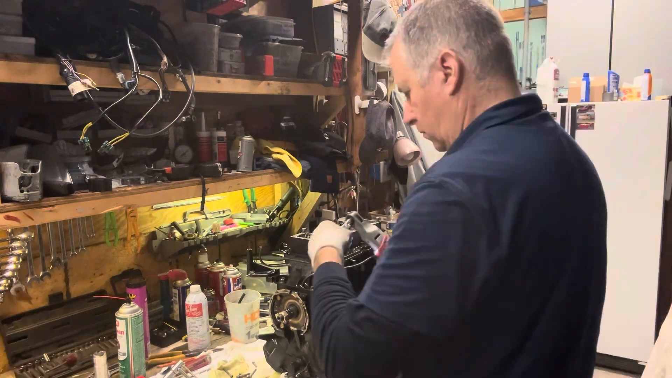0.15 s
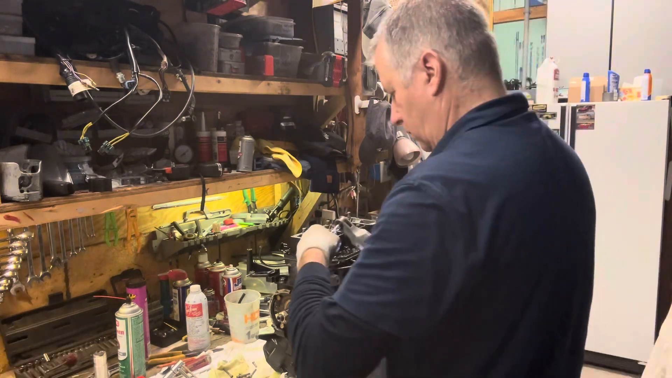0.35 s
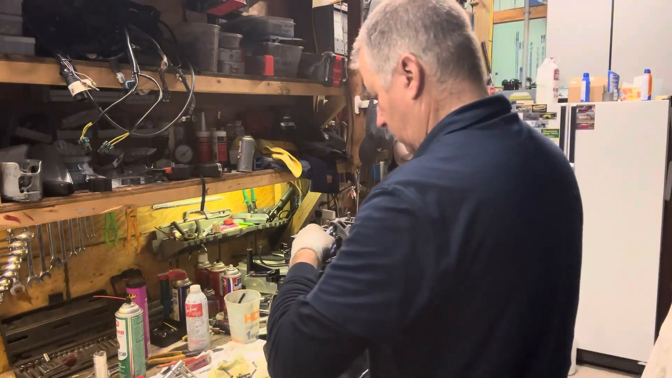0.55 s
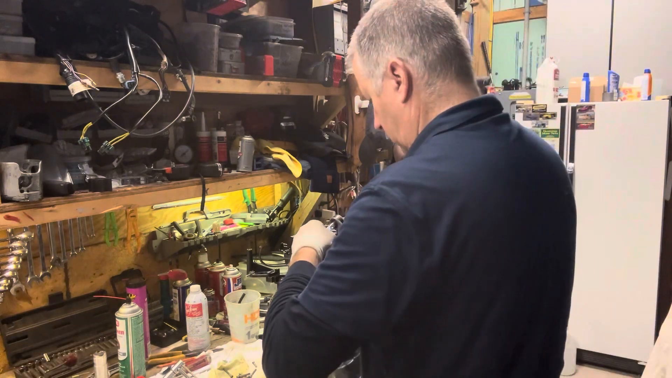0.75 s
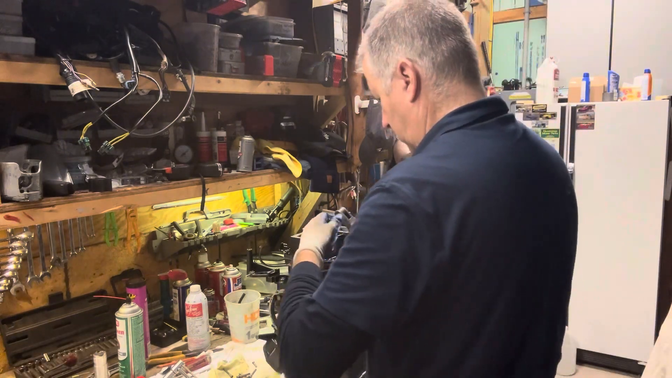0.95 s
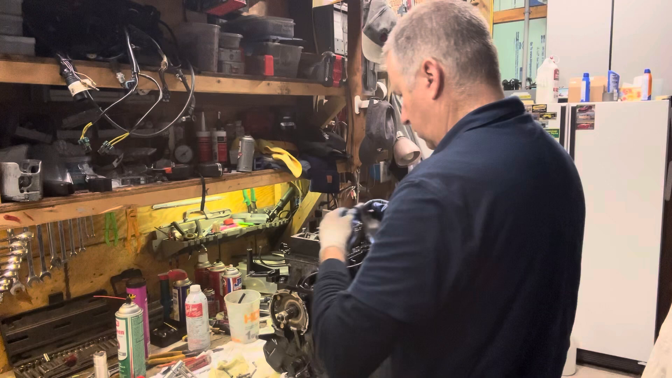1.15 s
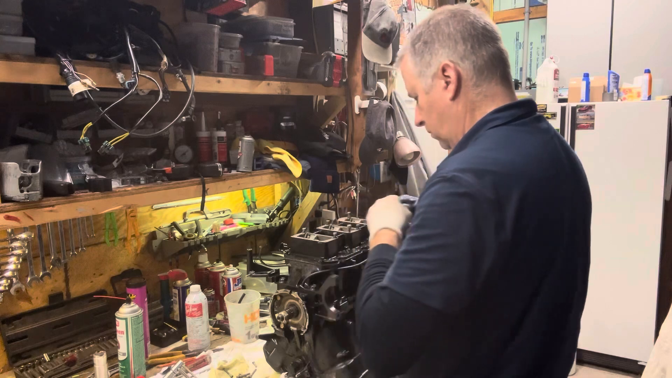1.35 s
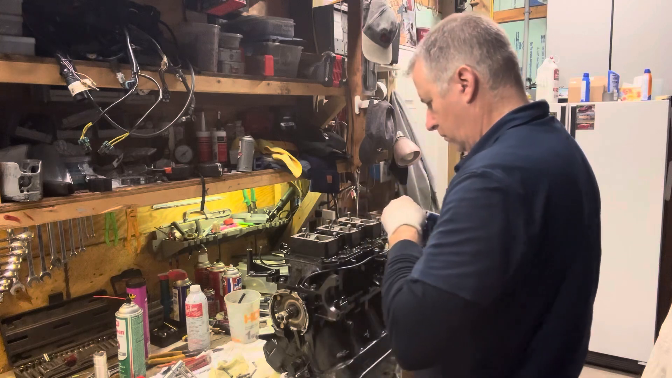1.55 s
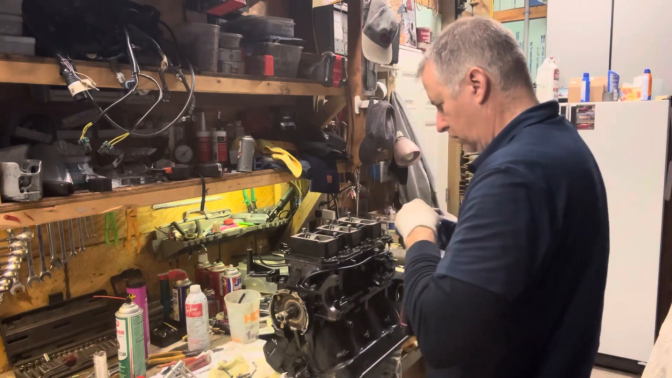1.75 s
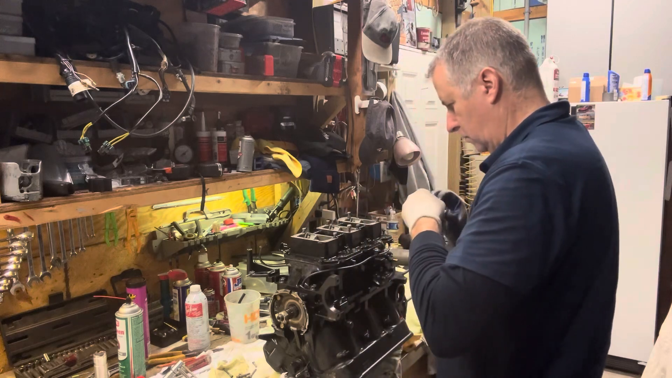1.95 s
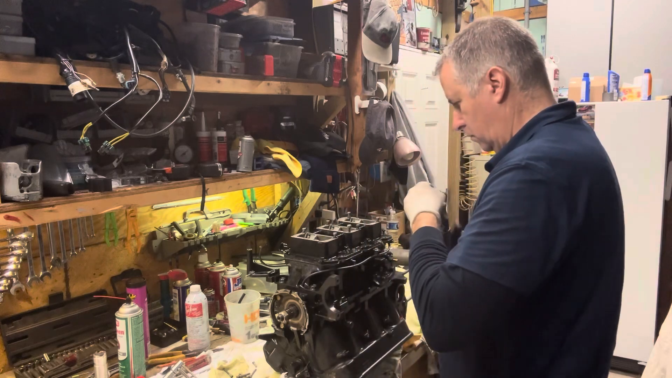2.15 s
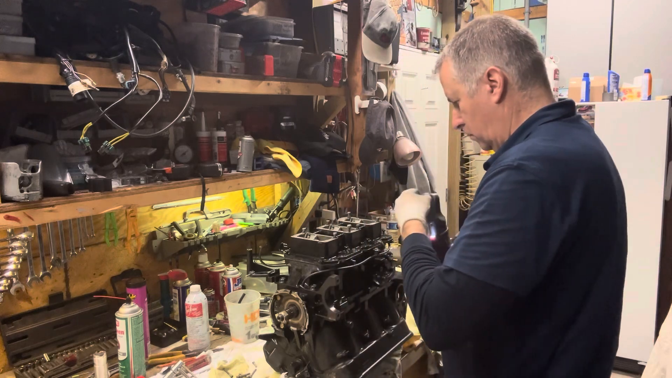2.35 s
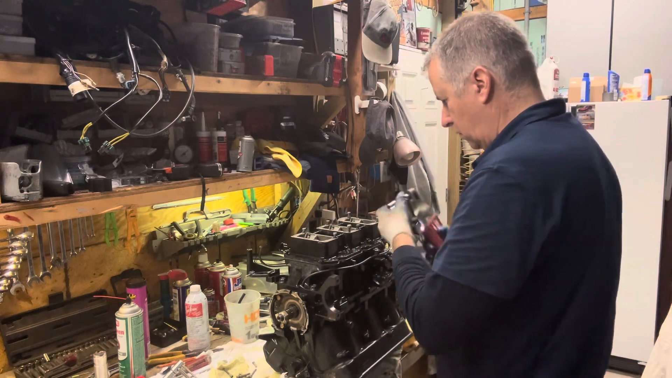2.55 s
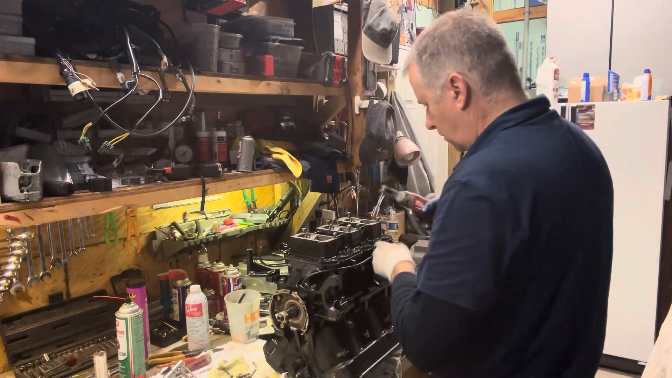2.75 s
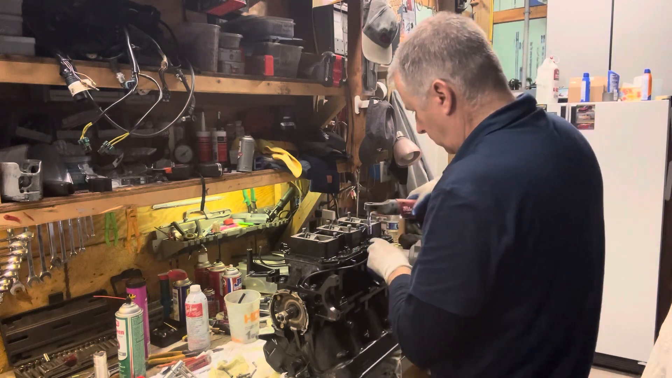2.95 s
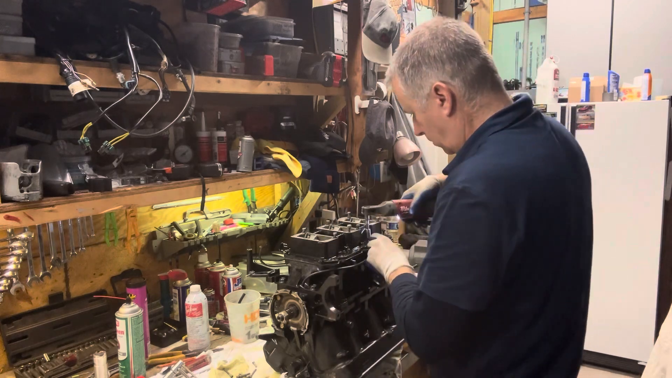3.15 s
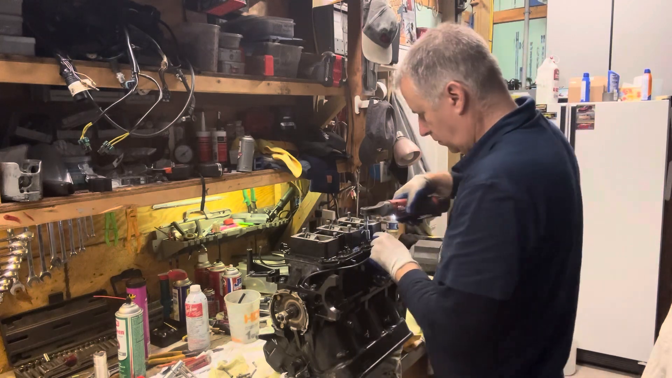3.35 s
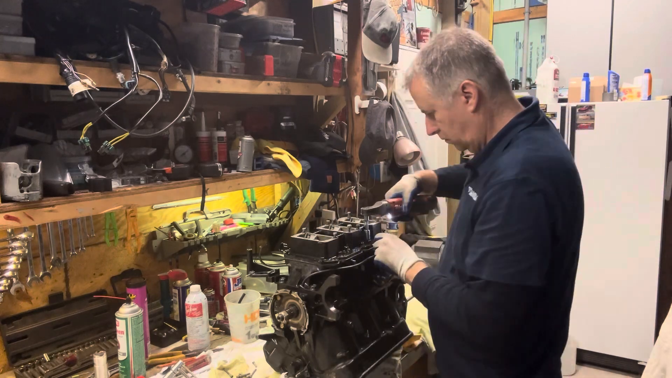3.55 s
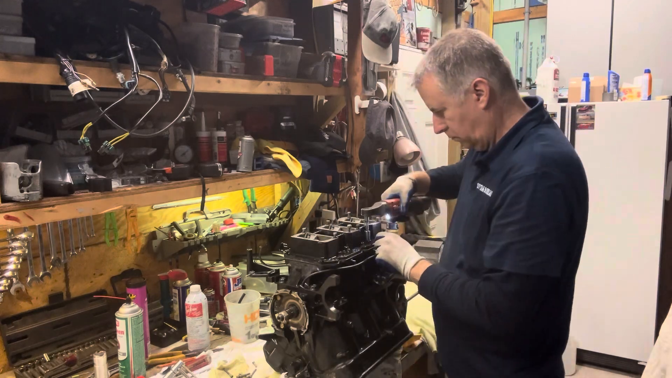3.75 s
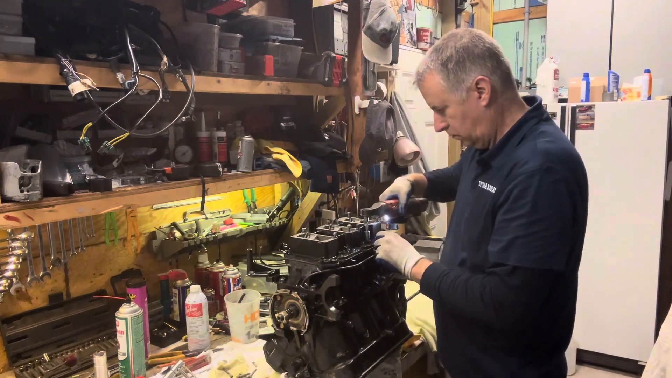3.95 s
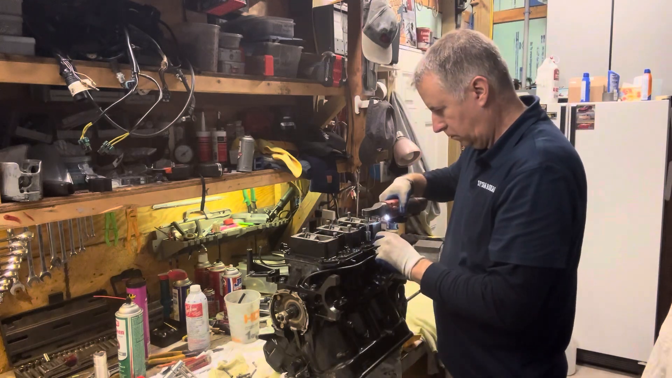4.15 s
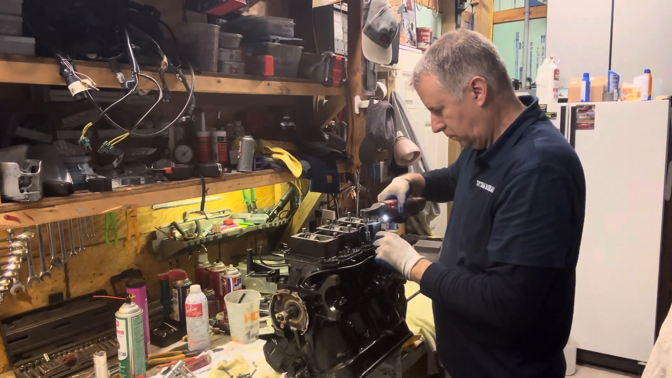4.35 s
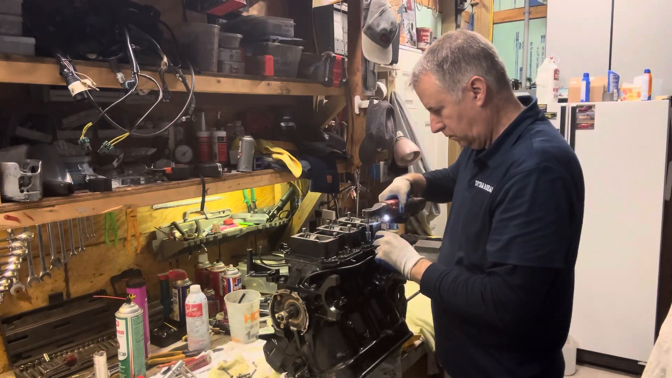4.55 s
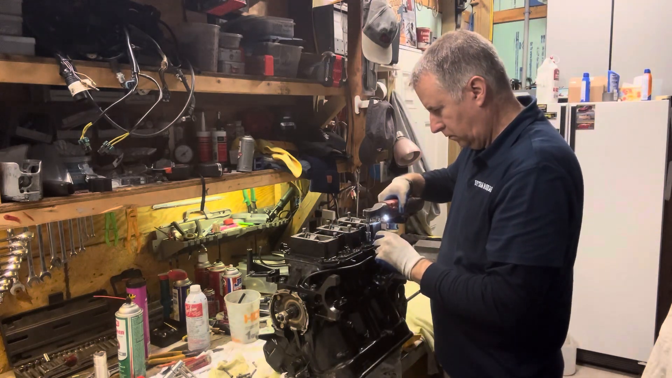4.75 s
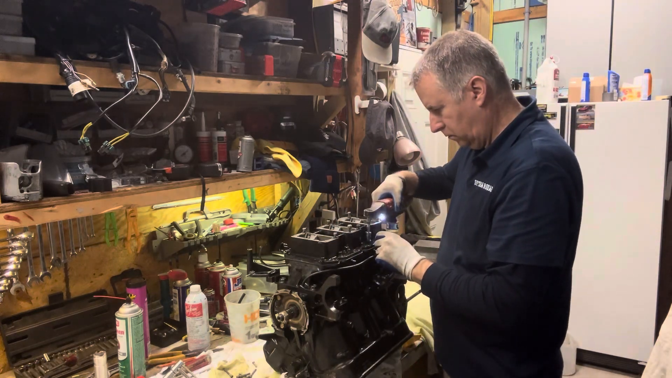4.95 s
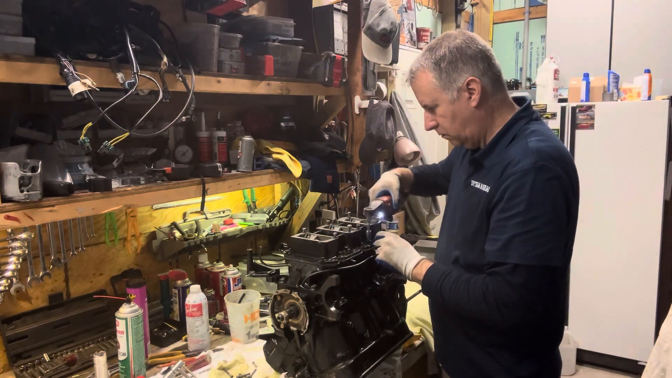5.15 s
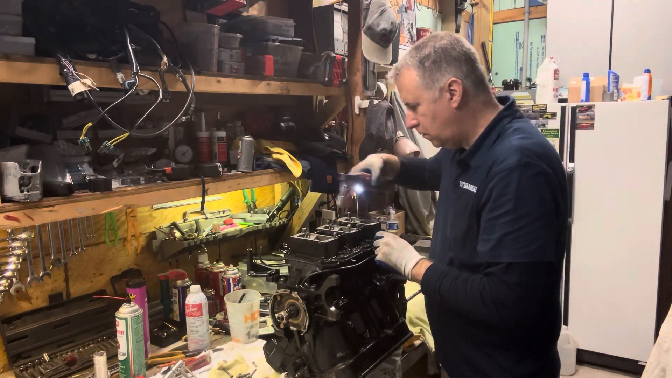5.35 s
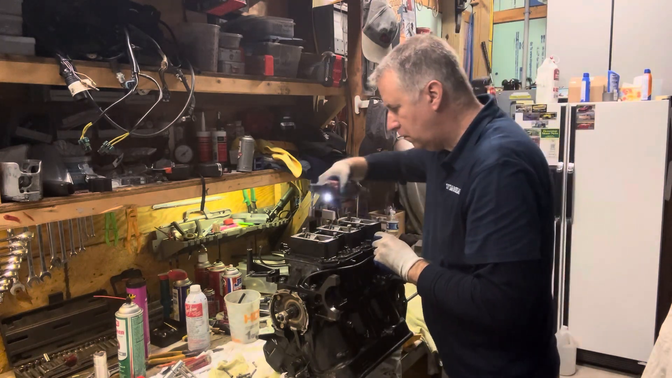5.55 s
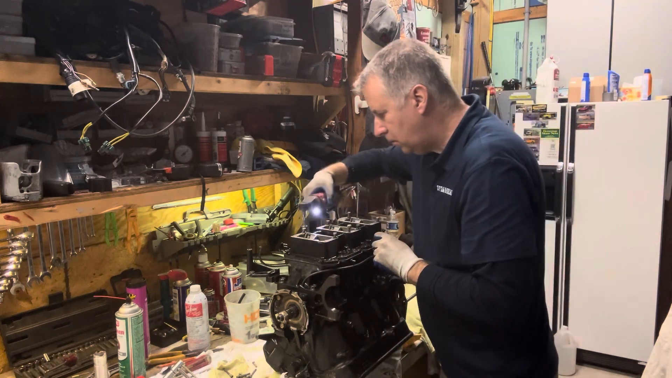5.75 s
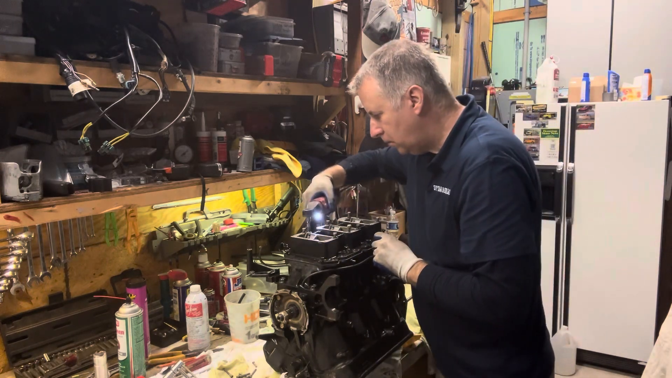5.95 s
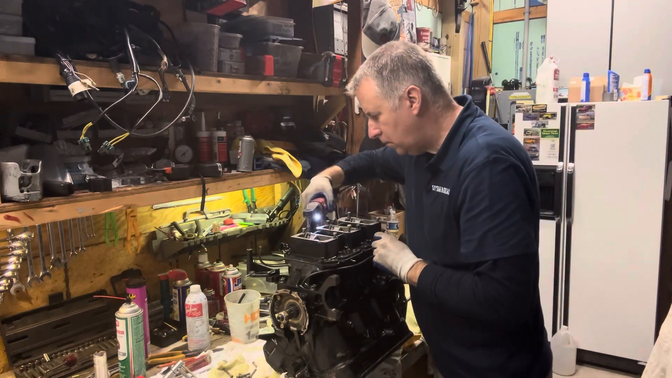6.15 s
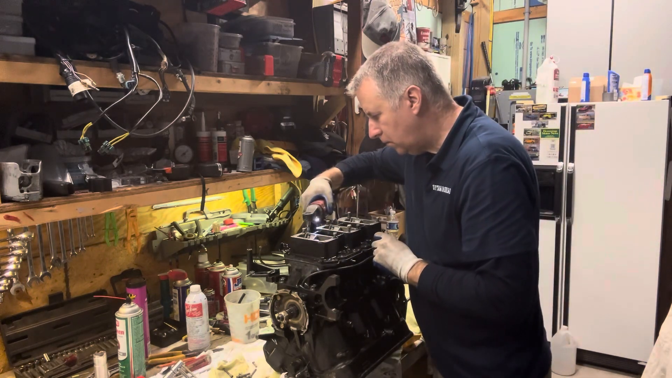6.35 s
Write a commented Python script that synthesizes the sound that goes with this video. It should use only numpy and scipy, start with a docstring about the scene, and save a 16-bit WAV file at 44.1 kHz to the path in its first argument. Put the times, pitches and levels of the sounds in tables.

```python
"""Over the low rumble of a small garage, a cordless ratchet runs a bolt into an engine block: the
motor sings as it starts, gear impacts excite the metal's modes and the pawl snaps once a stroke.
For three seconds the socket clinks on the bolts, and sleeves and shoes scuff by stick-slip friction.
A long burst follows, rising and then sagging in speed, and just after it a short, slow one.
More clinks and scuffs lead to a fourth brief burst at the end."""
import sys
import numpy as np
from scipy import signal
from scipy.fft import rfft, irfft, next_fast_len
from scipy.io import wavfile
from scipy.ndimage import map_coordinates

SR = 44100
rng = np.random.default_rng(int(sys.argv[2]) if len(sys.argv) > 2 else 0)


def master(y):
    """Save y as 16-bit WAV."""
    cut = np.clip(np.atleast_2d(y).T, -1, 1)
    pcm = np.round(cut * 32767)  # scale
    wavfile.write(sys.argv[1], SR, pcm.astype(np.int16))


N = 281799

# Levels in the tables are relative; each source adds its own gain.
# trigger pulls: press_s, release_s, rattle_db, treble_db, ring_db, pawl_db, tones_db
TRIGGER_PULLS = [(0.146, 0.408, -32, -34.5, -36.5, -18.5, -9), (3.482, 4.603, -33, -29, -38, -13.5, -0.5),
                 (4.764, 4.92, -31, -36, -39.5, -10.5, -4), (6.111, 6.401, -29.5, -43, -38, -8.5, -1)]
# speed that trigger and bolt allow, one curve per pull: time_s, stroke_rate_hz
SPEED_LIMITS = [
    [(.18, 55), (.3, 63), (.42, 43)],
    [(3.52, 56), (3.65, 68), (3.82, 74), (3.9, 71), (3.97, 58), (4.13, 52.5), (4.39, 50), (4.49, 35),
     (4.61, 32)],
    [(4.8, 32), (4.82, 33), (4.87, 36), (4.89, 22), (4.93, 13)],
    [(6.16, 29.5), (6.39, 35)],
]
# spectrum of the gear rattle: frequency_hz, density_db
GEAR_SPECTRUM = [(20, -47), (150, -25), (300, -15.5), (560, -12.5), (900, -6), (1400, -15.5), (1900, -2.5),
                 (2600, -4), (4400, 0), (5800, 3.5), (7500, 0), (10500, -1.5), (13600, -2), (15700, -7.5)]
# spectrum of the gears' treble sizzle: frequency_hz, density_db
SIZZLE_SPECTRUM = [(4000, -32), (8200, 3.0), (10500, -0.5), (15000, -11.0)]
# modes of tool and engine block: pitch_hz, width_hz, level_db
HOUSING_MODES = [(416, 36, -9), (773, 75, 8), (970, 200, -1.5), (1140, 100, 7), (1482, 130, 1),
                 (2020, 130, -13), (3540, 720, -13), (5690, 160, -10)]
# tones of the crank, the gear mesh (it meets two resonances) and its octave: cycles_per_stroke
SHAFT_ORDERS = [2, 23, 23, 46]
# the resonance belonging to each of these tones: centre_hz, half_width_hz, level_db
SHAFT_RESONANCES = [(101, 8.9, -48.5), (1080, 70, -41.5), (1540, 120, -41), (3370, 140, -35)]
# hard catches of the pawl: start_s, level_db
HARD_CATCHES = [(0.1854, -17), (3.5188, -16.5), (3.5579, -16.5), (3.6381, -19.5), (3.8725, -15.5),
                (3.9289, -14.5), (4.0209, -20), (4.207, -15), (4.2802, -16), (4.2989, -17.5), (4.4655, -17),
                (4.554, -21.5)]
# spectrum of a pawl snap: frequency_hz, density_db
PAWL_SPECTRUM = [(500, -45), (3000, -19), (9000, -19), (11500, 0), (13500, 10), (15700, -17.5)]
# socket and tool touch the bolts: start_s, level_db, knock_offset_db, clink_offset_db
BOLT_CONTACTS = [(0.484, -40, -20, -18), (0.699, -44.5, -5, -41), (0.763, -46, -1, -24.5),
                 (0.775, -41, -11.5, -22), (1.12, -64, -44, -10.5), (1.875, -24.5, -30, -7),
                 (2.185, -41.5, -4, -23), (3.144, -59, 4, -18), (3.161, -37, -11, -18),
                 (3.42, -52.5, -5.5, -13.5), (5.116, -41, -21, -8.5), (5.309, -45.5, -7.5, -26),
                 (5.936, -37.5, -14, -16.5), (6.042, -58, -8.5, -16.5)]
# spectrum of a dull knock: frequency_hz, density_db
KNOCK_SPECTRUM = [(100, -14.5), (500, -9.5), (1200, -4.5), (2200, -6.5), (4000, -4.5), (12000, -31)]
# spectrum of a steel clink: frequency_hz, density_db
CLINK_SPECTRUM = [(300, -29), (800, -8.5), (1800, -28), (3500, -17), (7000, -7.5), (10000, -5), (13500, 2),
                  (15700, -11.5)]
# loose socket and hollow tool body ring: start_s, pitch_hz, level_db, spread_ratio, t60_s
SOCKET_PINGS = [(0.14, 4095, -26, 0.035, 0.042), (0.485, 1140, -46.5, 0.12, 0.053),
                (.699, 1130, -45.5, 0.13, .07), (.764, 1140, -51.5, 0.19, 0.06),
                (2.275, 2220, -73, .012, 0.74), (2.425, 2220, -50, .025, 0.14),
                (2.455, 640, -45.5, 0.09, 0.14), (2.974, 4570, -58, 0.13, 0.05),
                (3.058, 3700, -64, 0.11, 0.038), (5.938, 4380, -37, 0.18, 0.052)]
# soft thumps of feet and tool body: start_s, pitch_hz, level_db, t60_s
BODY_THUMPS = [(.877, 280, -59.5, 0.57), (4.831, 328, -44, 0.17), (4.848, 84.4, -44, 0.31),
               (4.881, 39.6, -46, 0.39), (5.311, 251, -37, 0.048)]
# sleeves, gloves and shoes slide: peak_s, hold_s, rise_s, rub_db, hiss_db
SCUFF_EVENTS = [(0, 0.14, .01, -64, -66), (0.477, 0.011, 0.0046, -45.5, -61),
                (0.56, 0.017, .01, -63.5, -81), (0.884, 0.095, 0.022, -60, -67.5),
                (1.113, 0.064, 0.12, -72, -68.5), (1.488, 0.2, 0.0165, -52, -67),
                (2.036, 0.016, 0.024, -71, -72), (2.181, 0.014, 0.0043, -61.5, -69.5),
                (2.243, 0.029, 0.021, -54.5, -66.5), (2.444, 0.034, 0.013, -46.5, -54),
                (2.74, 0.056, 0.032, -67, -72), (3.258, 0.037, 0.018, -76, -76.5),
                (3.454, 0.046, 0.038, -56, -67.5), (5.116, 0.0106, 0.0076, -56, -64.5),
                (5.272, .045, 0.04, -55.5, -67)]
# spectrum of a scuff's midrange rub: frequency_hz, density_db
RUB_SPECTRUM = [(80, -27), (300, -10), (480, -8.5), (620, 0), (1050, -1), (1550, 1), (2000, -1.5),
                (2500, -3), (4500, -10.5), (12000, -32)]
# spectrum of a scuff's hiss: frequency_hz, density_db
HISS_SPECTRUM = [(1000, -23), (4000, 3.5), (7000, 4.5), (11000, 0), (14500, -5), (16000, -24.5)]
# reverberation time of the garage: frequency_hz, t60_s
GARAGE_DECAY = [(100, 0.46), (500, 0.18), (2000, 0.2), (6000, 0.22), (14000, 0.14)]
# spectrum of the room's drone: frequency_hz, density_db
RUMBLE_SPECTRUM = [(20, -23.5), (36, -16.5), (52, 4.5), (70, -3.5), (95, -11.5), (160, -19), (400, -32),
                   (1000, -62)]
# spectrum of the room's faint hiss: frequency_hz, density_db
AIR_SPECTRUM = [(100, -2.5), (400, 2), (1000, -11), (4000, -17.5), (10000, -19.5), (15000, -28)]
# stereo width: frequency_hz, side_gain
STEREO_WIDTH = [(50, .25), (130, 0.28), (300, 0.84), (1200, 0.92), (2500, 1), (7000, 0.53), (8200, .1),
                (11000, .1), (12200, 0.77), (13300, .05)]
# left-right phase, with the top treble in opposite phase: frequency_hz, left_lead_rad
STEREO_PHASE = [(50, 0), (900, -0.67), (1800, 0.4), (2800, -1.5), (5800, -2), (7200, -1.54), (7700, -1),
                (11300, 0.5), (12100, 1.48), (13000, 3), (14200, 3.05)]


def gears(speed, turns, rattle_db, ring_db, treble_db, throb_db, rough_db, drift_db):
    """Impact excitation: teeth clatter, louder with speed and once a stroke, and set the metal ringing."""
    rattle_gain = amp(rattle_db) * drive(speed, "rattle", doubling_db=8.5)
    treble_gain = amp(treble_db + drift_db * wobble(25)) * drive(speed, "treble", doubling_db=9)
    ring_gain = amp(ring_db + drift_db * wobble(17)) * drive(speed, "ring", doubling_db=7)
    throb = amp(throb_db * np.cos(2 * np.pi * turns) + rough_db * wobble(120))
    teeth = grains(rate_hz=5000, spread_db=1.5) * throb
    ticks = grains(rate_hz=1800, spread_db=-1) * throb
    rattle = rattle_gain * coloured(teeth, GEAR_SPECTRUM)
    body = ring_gain * unit(filtered(teeth, housing))
    sizzle = treble_gain * coloured(ticks, SIZZLE_SPECTRUM)
    return rattle + body + sizzle


def housing(hz):
    """Modal superposition: the metal responds as a sum of damped resonators of alternating sign."""
    return sum((-1) ** k * amp(db) * 1j * hz * width / (pitch ** 2 - hz ** 2 + 1j * hz * width)
               for k, (pitch, width, db) in enumerate(HOUSING_MODES))


def pawl(speed, turns, catch_db, bounce_s, t60_s):
    """Rebound: the sprung pawl drops each stroke and bounces twice; at times it catches hard."""
    out = np.zeros(N)
    force = drive(speed, "pawl", doubling_db=2.8)
    catch_times = np.array(HARD_CATCHES)[:, 0]
    snaps = [(start, amp(db + catch_db)) for start, db in HARD_CATCHES]
    for i in np.flatnonzero(np.diff(np.floor(turns)) > 0):
        if np.abs(catch_times - i / SR).min() > .012:  # a hard catch takes the place of a nearby snap
            snaps.append((i / SR, force[i] * amp(2 * rng.standard_normal())))
    for start, size in snaps:
        for bounce in range(3):
            delay = bounce * bounce_s * rng.uniform(.85, 1.15)
            add(out, start + delay, size * burst(PAWL_SPECTRUM, t60_s))
    return out


def shaft_whine(speed, turns, jitter_turns, waver_db):
    """Forced resonance: each crank or gear tone swells as the speed brings it near its resonance."""
    angle = 2 * np.pi * (turns + jitter_turns * wobble(40))  # the shaft speed is never quite even
    stroke_hz = speed.sum(axis=0)
    tones = np.zeros(N)
    for order, (centre, half_width, db) in zip(SHAFT_ORDERS, SHAFT_RESONANCES):
        detune = (order * stroke_hz - centre) / half_width
        tones += amp(db + waver_db * wobble(21)) * np.sin(order * angle) / (1 + detune ** 2)
    return drive(speed, "tones", doubling_db=3.5) * tones


def motor(turns, switch_hz, level_db, upper_db, rise_s, fade_s):
    """Modulation: the speed control sings at each press, its sidebands parting as the rotor speeds up."""
    t = clock()
    envelope = sum(np.clip((t - press) / rise_s, 0, 1) * (t < release) * np.exp(-abs(t - press) / fade_s)
                   for press, release, *_ in TRIGGER_PULLS)
    rotor_turns = 23 * turns
    lower = np.sin(2 * np.pi * (switch_hz * t - rotor_turns))
    upper = np.sin(2 * np.pi * (switch_hz * t + rotor_turns))
    return amp(level_db) * envelope * (lower + amp(upper_db) * upper)


def stroke_rates(spin_up_s, brake_s):
    """Inertia: the motor spins up on press and brakes on release. Strokes a second, a row per pull."""
    t = clock()
    rates = []
    for (press, release, *_), curve in zip(TRIGGER_PULLS, SPEED_LIMITS):
        spin_up = 1 - np.exp(-np.maximum(0, t - press) / spin_up_s)
        brake = np.exp(-np.maximum(0, t - release) / brake_s)
        rates.append(np.interp(t, *np.transpose(curve)) * spin_up * brake)
    return np.array(rates)


def strokes(speed):
    """Phase is the integral of rate: strokes completed since the latest press of the trigger."""
    turns = np.zeros(N)
    for (press, *_), rate in zip(TRIGGER_PULLS, speed):
        turns = np.where(clock() >= press, np.cumsum(rate) / SR, turns)
    return turns


def drive(speed, layer, doubling_db, reference_hz=60):
    """Power law: a layer's level in each pull grows by doubling_db for each doubling of speed."""
    column = 2 + ["rattle", "treble", "ring", "pawl", "tones"].index(layer)
    pull_db = np.array(TRIGGER_PULLS)[speed.argmax(axis=0), column]
    doublings = np.log2(speed.sum(axis=0) / reference_hz + 1e-20)
    return amp(pull_db + doubling_db * doublings)


def contacts(knock_db, clink_db, knock_t60_s, clink_t60_s, soft_s):
    """Contact stiffness sets brightness: the gloved tool body knocks dully, bare steel clinks."""
    out = np.zeros(N)
    for start, db, dull_db, bright_db in BOLT_CONTACTS:
        knock = burst(KNOCK_SPECTRUM, knock_t60_s)
        onset = np.minimum(1, np.arange(len(knock)) / SR / (2 * soft_s)) ** 2
        add(out, start - soft_s, amp(db + dull_db + knock_db) * knock * onset)
        add(out, start, amp(db + bright_db + clink_db) * burst(CLINK_SPECTRUM, clink_t60_s))
    return out


def handling(ping_db, thump_db):
    """Free vibration: the socket pings briefly; feet and tool body thump."""
    out = np.zeros(N)
    for start, hz, db, spread, t60_s in SOCKET_PINGS:
        add(out, start, amp(db + ping_db) * ring(hz, t60_s, spread))
    for start, hz, db, t60_s in BODY_THUMPS:
        add(out, start, amp(db + thump_db) * ring(hz, t60_s, spread=0.54))
    return out


def scuffs(rub_db, hiss_db, fall_s):
    """Stick-slip friction: cloth and soles slide in dense small slips that swell, hold and die away."""
    shapes = np.array([held(peak, peak + hold, rise, fall_s) for peak, hold, rise, *_ in SCUFF_EVENTS])
    *_, rub_levels, hiss_levels = np.transpose(SCUFF_EVENTS)
    rub = amp(rub_levels) @ shapes * coloured(grains(rate_hz=2700, spread_db=8.5), RUB_SPECTRUM)
    hiss = amp(hiss_levels) @ shapes * coloured(grains(rate_hz=5700, spread_db=7.5), HISS_SPECTRUM)
    return amp(rub_db) * rub + amp(hiss_db) * hiss


def garage(x, wet_db, build_s, shift_hz):
    """Reverberation: shelves and walls add short echoes, which change as the radiating spot moves."""
    hz, t, noise = signal.stft(rng.standard_normal((4, SR // 2)), SR, nperseg=256)
    decay = np.exp(-np.log(1000) * t / along(GARAGE_DECAY, hz)[:, None])
    tails = signal.istft(noise * decay, SR, nperseg=256)[1]
    tails *= 1 - np.exp(-np.arange(tails.shape[1]) / SR / build_s)
    pose = np.pi * wobble(shift_hz)
    blend = np.array([np.cos(pose)] * 2 + [np.sin(pose)] * 2)  # between two stereo pairs of tails
    echoes = signal.fftconvolve(x * blend, tails / np.linalg.norm(tails[0]), axes=1)[:, :N]
    return (x + amp(wet_db) * (echoes[:2] + echoes[2:])) / np.sqrt(1 + amp(wet_db) ** 2)


def rumble(level_db, swell_db, air_db):
    """Ambient noise: the room's low drone swells a little under a steady faint hiss."""
    swell = amp(level_db + swell_db * wobble(3.9))
    drone = swell * coloured(rng.standard_normal((2, N)), RUMBLE_SPECTRUM)
    return drone + amp(air_db) * coloured(rng.standard_normal((2, N)), AIR_SPECTRUM)


def ring(hz, t60_s, spread):
    """Damped modes: a dense cluster around one pitch dies away exponentially."""
    t = np.arange(SR // 2) / SR
    detune = (np.fft.rfftfreq(len(t), 1 / SR) / hz - 1) / spread
    phases = np.exp(2j * np.pi * rng.random(len(detune)))
    cluster = irfft(phases / (1 + detune ** 2), len(t))
    return unit(cluster) * np.exp(-np.log(1000) * t / t60_s) * (1 - np.exp(-t * hz))


def burst(spectrum, t60_s, size=4096):
    """A broadband transient: decaying coloured noise with peak 1."""
    gain = amp(along(spectrum, np.fft.rfftfreq(size, 1 / SR)))
    noise = irfft(rfft(rng.standard_normal(size)) * gain)
    crack = noise * np.exp(-np.log(1000) * np.arange(size) / SR / t60_s)
    return crack / np.abs(crack).max()


def grains(rate_hz, spread_db):
    """A Poisson process: tiny impacts of random sign and size."""
    impacts = (rng.random(N) < rate_hz / SR) * np.sign(rng.standard_normal(N))
    return impacts * amp(spread_db * rng.standard_normal(N))


def held(start_s, end_s, rise_s, fall_s):
    """Exponential growth up to start_s, a plateau, and exponential decay after end_s."""
    t = clock()
    return np.exp(-np.maximum(0, start_s - t) / rise_s - np.maximum(0, t - end_s) / fall_s)


def wobble(rate_hz):
    """Spline interpolation: a smooth curve through rate_hz random knots a second."""
    return map_coordinates(rng.standard_normal(int(N * rate_hz / SR) + 4), [clock() * rate_hz])


def coloured(x, spectrum):
    """Spectral shaping, scaled to rms 1."""
    return unit(filtered(x, lambda hz: amp(along(spectrum, hz))))


def filtered(x, response):
    """Linear filtering: the spectrum of x times a complex frequency response."""
    size = next_fast_len(N + SR // 2)
    return irfft(rfft(x, size) * response(np.fft.rfftfreq(size, 1 / SR)), size)[..., :N]


def along(points, hz):
    """Interpolation on a logarithmic frequency axis."""
    frequencies, values = np.transpose(points)
    return np.interp(np.log(hz + 1), np.log(frequencies + 1), values)


def add(track, start_s, sound):
    """Superposition: a sound joins the track at start_s."""
    part = track[max(0, round(start_s * SR)):][:len(sound)]
    part += sound[:len(part)]


def amp(db):
    return 10 ** (np.asarray(db) / 20)


def unit(x):
    return x / np.sqrt(np.mean(x ** 2) + 1e-20)


def clock():
    return np.arange(N) / SR


def scene():
    """Superposition: the ratchet and the worker's movements echo in the garage, over its rumble."""
    speed = stroke_rates(spin_up_s=.025, brake_s=.008)
    turns = strokes(speed)
    rattle = gears(speed, turns, rattle_db=6.5, ring_db=1, treble_db=-3.5,
                   throb_db=2, rough_db=2.5, drift_db=1.24)
    tones = shaft_whine(speed, turns, jitter_turns=.002, waver_db=2.5)
    tones += motor(turns, switch_hz=10040, level_db=-40, upper_db=-18, rise_s=.0093, fade_s=.66)
    tool = garage(rattle, wet_db=3, build_s=.0055, shift_hz=25)
    tool += garage(tones, wet_db=3, build_s=.002, shift_hz=4)
    touches = contacts(knock_db=16.5, clink_db=17, knock_t60_s=.044, clink_t60_s=.0091, soft_s=.004)
    touches += scuffs(rub_db=-1.5, hiss_db=2.5, fall_s=.0091)
    worker = garage(touches, wet_db=6, build_s=.0029, shift_hz=15)
    worker += garage(handling(ping_db=-2.5, thump_db=1.5), wet_db=-2.5, build_s=.0051, shift_hz=12)
    room = rumble(level_db=-60.5, swell_db=1, air_db=-75.5)
    snaps = pawl(speed, turns, catch_db=7.5, bounce_s=.0026, t60_s=.004)
    tool += garage(snaps, wet_db=-1.5, build_s=.004, shift_hz=13)
    return tool + worker + room


def record(dry):
    """Mid-side stereo: width and left-right phase vary with frequency; then a steep low-pass."""
    mid = (dry[0] + dry[1]) / 2
    side = filtered((dry[0] - dry[1]) / 2, lambda hz: along(STEREO_WIDTH, hz))
    stereo = np.array([mid + side, mid - side])
    stereo = filtered(stereo, lambda hz: np.exp(np.array([[.5j], [-.5j]]) * along(STEREO_PHASE, hz)))
    return filtered(stereo, lambda hz: 1 / (1 + (hz / 15850) ** 200))


dry = scene()
out = record(dry)
master(out)
```